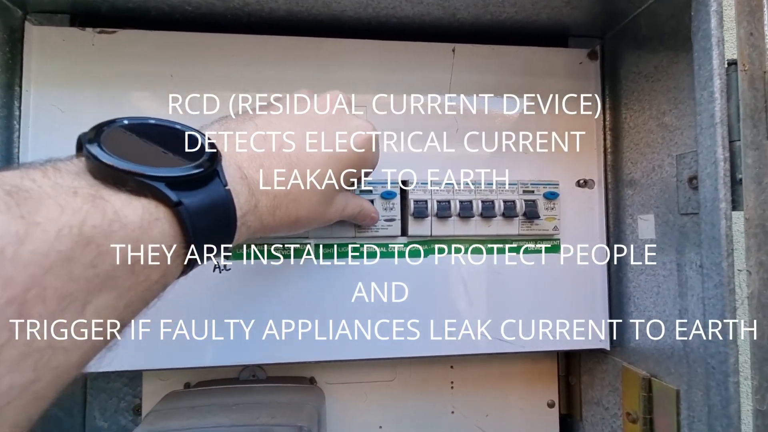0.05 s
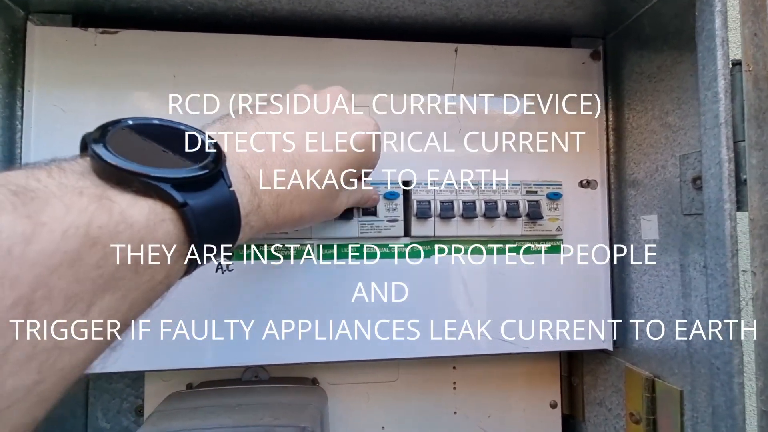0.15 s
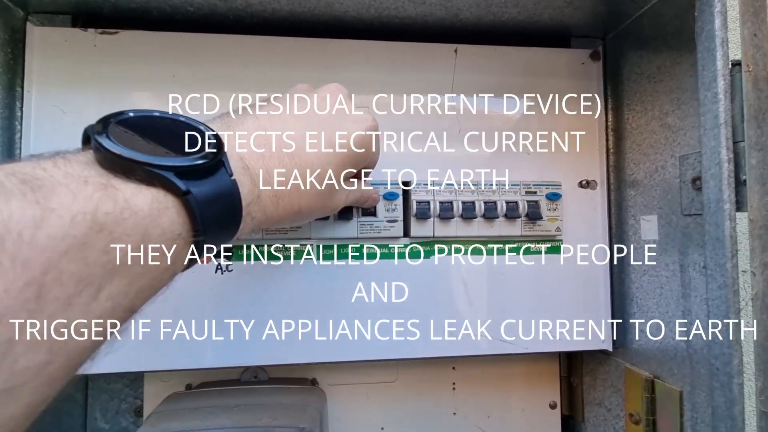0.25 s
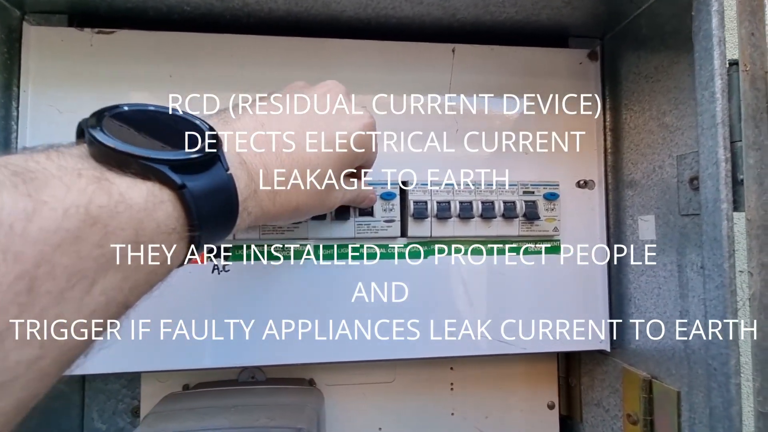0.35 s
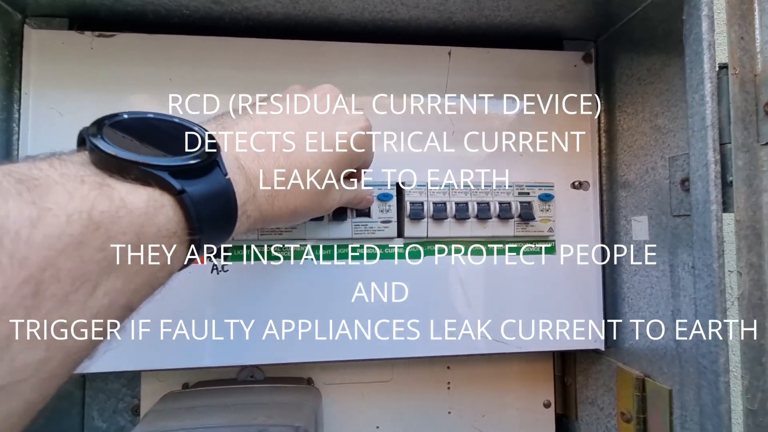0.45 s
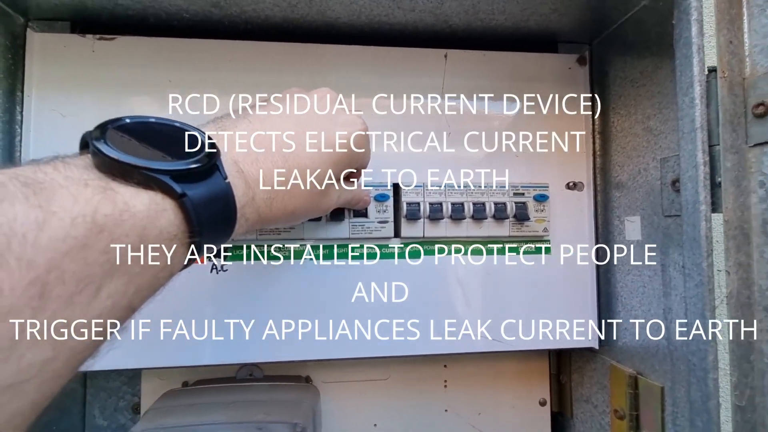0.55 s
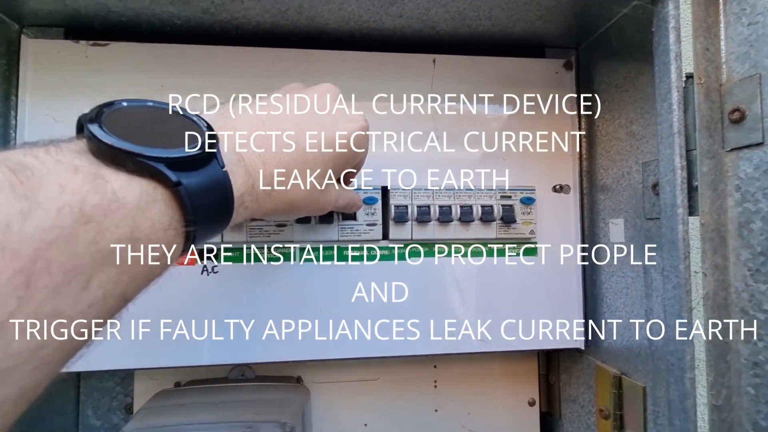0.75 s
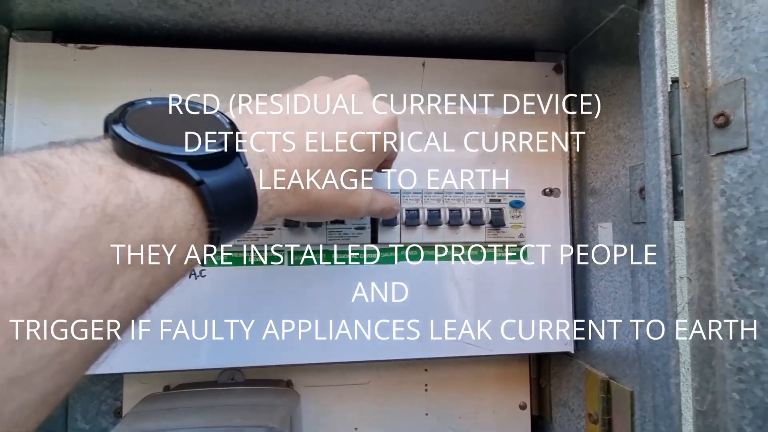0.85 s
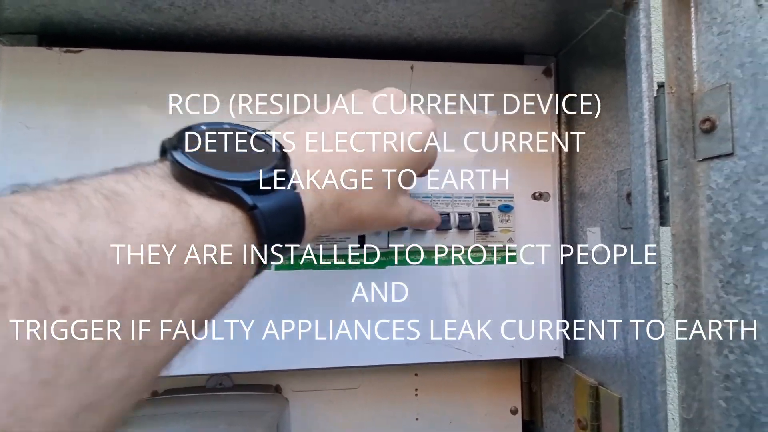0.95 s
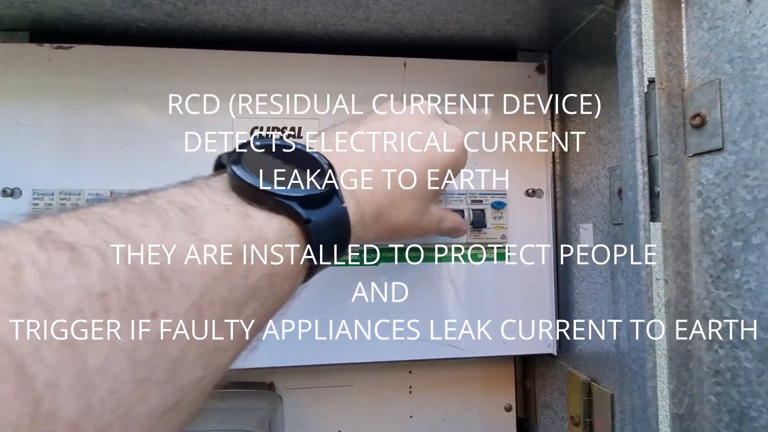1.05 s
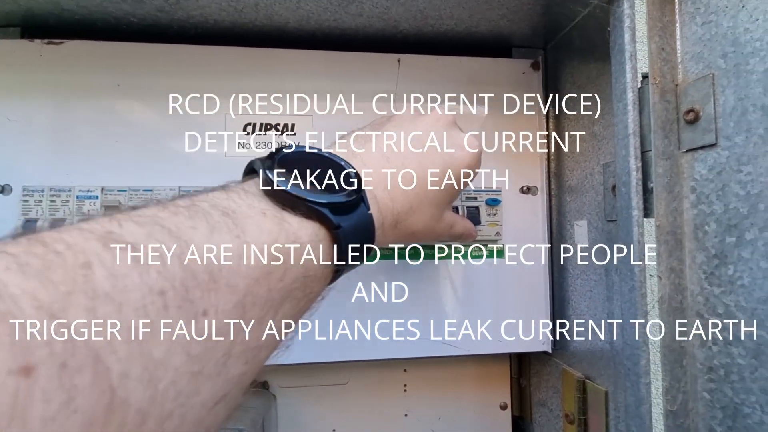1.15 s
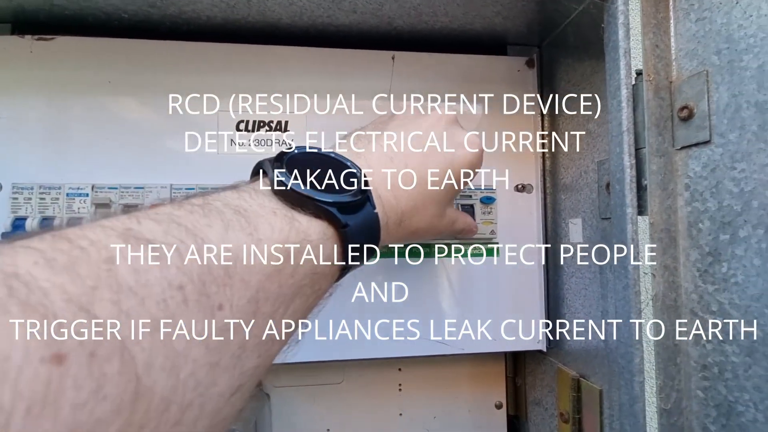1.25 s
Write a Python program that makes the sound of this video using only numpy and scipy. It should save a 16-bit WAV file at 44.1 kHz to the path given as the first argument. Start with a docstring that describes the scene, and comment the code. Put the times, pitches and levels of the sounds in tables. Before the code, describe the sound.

A switch on an outdoor electrical panel is flicked on with one sharp click.

```python
"""Safety switch on an outdoor switchboard.

A thumb pushes up the lever, close by. The latch ticks, the sprung contacts snap shut and rattle,
and the lever's thud rings the panel in its steel cabinet. The hand bumps the panel lightly.
A far bird calls over a quiet outdoor rumble."""
import sys
import numpy as np
from scipy import signal
from scipy.fft import rfft, irfft, next_fast_len
from scipy.io import wavfile

SR = 44100
rng = np.random.default_rng(int(sys.argv[2]) if len(sys.argv) > 2 else 0)


def master(y):
    """Save y as 16-bit WAV."""
    cut = np.clip(np.atleast_2d(y).T, -1, 1)
    pcm = np.round(cut * 32767)  # scale
    wavfile.write(sys.argv[1], SR, pcm.astype(np.int16))


N = 57330

# contact snaps and rattle (time [s], level [dB], t60 [s], echo [dB], metal ring [dB], top treble [dB])
CONTACT_SNAPS = [(0.2398, -20.5, 0.035, -15.5, -2.5, -1), (0.2693, -35, 0.04, -3.5, -14, 1),
                 (0.3138, -44, 0.037, -19.5, -9, -23.5), (0.349, -66, .05, 1, -14, -3.5)]
# snap spectrum (frequency [Hz], relative density [dB])
SNAP_SPECTRUM = [(300, -19.5), (1600, -19), (2150, -12.5), (3000, -10.5), (3800, -9), (4350, -12),
                 (5000, -3.5), (5850, -0.5), (6900, -3.5), (8200, -3), (10300, -8.5), (11200, -11.5),
                 (13000, -7.5), (15700, -15)]
# sliding lever's resonances (frequency [Hz], relative density [dB])
SCRAPE_SPECTRUM = [(1500, -50), (4200, -20.5), (6100, -6), (8600, -27.5), (11300, -4), (14000, -36)]
# switch's metal parts (frequency [Hz], relative level [dB], t60 [s])
METAL_MODES = [(2088, -26.5, 0.34), (2594, -21, .16), (5590, -15.5, 0.037), (5980, -6, 0.071),
               (6250, -4.5, 0.023), (7380, -15, .08), (8190, -11.5, .05)]
# blows on the panel (time [s], level [dB], tilt [dB/octave], share of full t60 [ratio])
PANEL_BLOWS = [(0.002, -48.5, -3, 0.27), (0.024, -57.5, 1.5, 0.47), (0.143, -52, -2.5, 0.61),
               (0.2452, -31.5, 5.5, 0.32), (0.2697, -26, 1.5, .9), (0.327, -49, -6, 0.62),
               (0.413, -52.5, 2.5, .7), (0.439, -54, -0.5, 0.87), (0.844, -69.5, 13.5, .5),
               (1.278, -58.5, -2.5, 0.83)]
# panel modes (frequency [Hz], relative level [dB], full t60 [s])
PANEL_RESONANCES = [(174.6, -12.5, .18), (273, -2.5, 0.33), (292.5, -6, 0.14), (344.5, -5.5, .36),
                    (372.6, -7, 0.37), (423.6, -7, 0.5), (466.6, -3, 0.33), (568, -8, 0.25),
                    (651, -11, 0.3), (832, -5.5, 0.2), (897, -9, .25), (1011, -16, .3), (1099, -14.5, 0.19),
                    (1187, -20, 0.28), (1319, -20, 0.24), (1591, -19.5, 0.25)]
# panel's dense clatter (frequency [Hz], relative density [dB])
CLATTER_SPECTRUM = [(40, -33.5), (100, -15.5), (200, 1.5), (450, 0.5), (700, -9), (900, 0), (1200, -11),
                    (1550, -11.5), (1750, -19), (2500, -19), (4200, -34.5), (9000, -44)]
# cabinet decay (frequency [Hz], full t60 [s])
CABINET_T60 = [(100, 0.13), (450, 0.5), (1000, 0.3), (2500, 0.28), (6000, 0.11), (14000, 0.13)]
# latch ticks (time [s], level [dB])
LATCH_TICKS = [(0.021, -67.5), (0.118, -55), (0.1219, -45), (0.143, -63)]
# tick spectrum (frequency [Hz], relative density [dB])
TICK_SPECTRUM = [(150, -18.5), (500, 1), (1050, -5.5), (1700, -23), (2400, -9.5), (3000, -21), (5500, -8.5),
                 (7100, -5.5), (7950, -3.5), (8800, -13.5), (11400, -17.5), (15500, -23)]
# latch ping (frequency [Hz], relative level [dB], t60 [s])
LATCH_PING = [(7950, -1, 0.025)]
# far bird's notes (time [s], length [s], pitch [Hz], level [dB])
BIRD_NOTES = [(0.524, 0.085, 3590, -78.5), (0.635, .09, 2264, -82.5), (0.672, 0.037, 3600, -82),
              (0.825, .05, 3567, -82), (0.873, 0.041, 3500, -80)]
# outdoor hiss (frequency [Hz], relative density [dB])
HISS_SPECTRUM = [(90, -35), (160, -5), (300, -1), (430, 2), (510, -12), (590, 1.5), (720, -7), (1050, -8),
                 (1900, -24), (3300, -25.5), (4200, -22), (9000, -20), (15700, -27)]
# outdoor rumble (frequency [Hz], relative density [dB])
RUMBLE_SPECTRUM = [(20, -29), (45, -5.5), (65, -0.5), (115, -2.5), (170, -16), (300, -48.5)]
# rumble swells (time [s], level [dB])
RUMBLE_ENVELOPE = [(0, -64.5), (.06, -70.5), (.13, -64.5), (.24, -63.5), (.36, -63), (.48, -62), (.54, -69),
                   (.62, -69), (.68, -63.5), (0.799, -69.5), (0.969, -70), (1.07, -62.5), (1.2, -70),
                   (1.3, -69)]


def contacts(shelf_from_hz=6800, shelf_full_hz=11000):
    """Sprung contacts crack shut, ring the switch's metal and echo in the cabinet."""
    out, t = np.zeros(N), clock()
    for start_s, db, t60_s, echo_db, metal_db, top_db in CONTACT_SNAPS:
        crack = noise(SNAP_SPECTRUM) * fade(t, t60_s)
        metal = amp(metal_db) * ring(METAL_MODES)
        echo = amp(echo_db) * cabinet(noise(SNAP_SPECTRUM)) * rise(attack_s=0.006)
        shelf = [(shelf_from_hz, 0), (shelf_full_hz, top_db)]
        snap = filtered(crack + metal + echo, lambda hz: amp(log_interp(shelf, hz)))
        add(out, start_s, amp(db) * snap * rise(attack_s=0.00043))
    return out


def lever_scrape(swell_s=0.011, swell_db=22, peak_db=-32):
    """The lever scrapes over its dead point, peaking at the first snap."""
    out, t = np.zeros(N), clock()
    swell = amp(peak_db + swell_db * np.minimum(t / swell_s - 1, 0))
    decay = fade(np.maximum(t - swell_s, 0), t60_s=0.0078)
    add(out, CONTACT_SNAPS[0][0] - swell_s, swell * decay * noise(SCRAPE_SPECTRUM))
    return out


def lever_thud(start_s=0.2697, hz=298, db=-20.5, t60_s=0.057):
    """The lever hits its stop: one short low mode."""
    out = np.zeros(N)
    add(out, start_s, ring([(hz, db, t60_s)]) * rise(attack_s=0.0019))
    return out


def panel(modes_db=-3, clatter_db=-7.5):
    """Each blow excites the panel's low modes and a dense clatter."""
    out = np.zeros(N)
    for start_s, db, db_per_octave, t60_share in PANEL_BLOWS:
        excitation = filtered(noise(CLATTER_SPECTRUM), lambda hz: tilt(hz, db_per_octave))
        clatter = amp(clatter_db) * cabinet(excitation, t60_share)
        modes = amp(modes_db) * ring(PANEL_RESONANCES, db_per_octave, t60_share)
        add(out, start_s, amp(db) * (modes + clatter) * rise(attack_s=0.0019))
    return out


def latch(tail_db=-12):
    """Small bright ticks as the lever takes up the spring."""
    out = np.zeros(N)
    for start_s, db in LATCH_TICKS:
        ping = ring(LATCH_PING)
        click = noise(TICK_SPECTRUM) * fade(clock(), t60_s=0.027)
        tail = amp(tail_db) * cabinet(noise(TICK_SPECTRUM))
        add(out, start_s, amp(db) * (ping + click + tail) * rise(attack_s=0.00096))
    return out


def cabinet(x, t60_share=1):
    """Each band of x decays at the steel cabinet's rate."""
    hz, t, bands = signal.stft(x, SR, nperseg=256)
    t60_s = t60_share * log_interp(CABINET_T60, hz)[:, None]
    return signal.istft(bands * fade(t, t60_s), SR, nperseg=256)[1][:N]


def bird(waver_rms_hz=65):
    """Faint wavering whistles."""
    out, t = np.zeros(N), clock()
    for start_s, length_s, hz, db in BIRD_NOTES:
        pitch_hz = hz + waver_rms_hz * noise([(100, 0), (400, -30), (2000, -80)])
        swell = np.sin(np.pi * np.minimum(t / length_s, 1))
        add(out, start_s, amp(db) * swell * np.sin(2 * np.pi * np.cumsum(pitch_hz) / SR))
    return out


def outdoors(hiss_db=-70):
    """Steady hiss over a swelling rumble."""
    rumble_db = np.interp(clock(), *np.transpose(RUMBLE_ENVELOPE))
    return amp(hiss_db) * noise(HISS_SPECTRUM) + amp(rumble_db) * noise(RUMBLE_SPECTRUM)


def ring(modes, db_per_octave=0, t60_share=1):
    """Damped sines; mode levels scatter by 1 dB per blow."""
    out, t = np.zeros(N), clock()
    for hz, db, t60_s in modes:
        gain = amp(db + rng.normal(0, 1)) * tilt(hz, db_per_octave)
        out += gain * fade(t, t60_share * t60_s) * np.sin(2 * np.pi * hz * t)
    return out


def noise(spectrum):
    """Random-phase noise of the given spectrum, rms 1."""
    hz = np.fft.rfftfreq(N, 1 / SR)
    phasors = np.exp(2j * np.pi * rng.random(len(hz)))
    x = irfft(amp(log_interp(spectrum, hz)) * phasors, N)
    return x / np.sqrt(np.mean(x ** 2) + 1e-20)


def filtered(x, response):
    """Zero-phase filter with gain response(hz)."""
    size = next_fast_len(N + SR // 2)
    hz = np.fft.rfftfreq(size, 1 / SR)
    return irfft(rfft(x, size) * response(hz), size)[..., :N]


def tilt(hz, db_per_octave):
    """Gain slope about 500 Hz, flat outside 200-1100 Hz."""
    return amp(db_per_octave * np.log2(np.clip(hz, 200, 1100) / 500))


def fade(t, t60_s):
    """Exponential decay."""
    return np.exp(-np.log(1000) * t / t60_s)


def rise(attack_s):
    """Soft onset."""
    return 1 - np.exp(-clock() / attack_s)


def log_interp(points, hz):
    """Read (frequency [Hz], value) points on a log axis."""
    knots_hz, values = np.transpose(points)
    return np.interp(np.log(hz + 1), np.log(knots_hz + 1), values)


def amp(db):
    """Decibels to gain."""
    return 10 ** (np.asarray(db) / 20)


def clock():
    """Sample times [s]."""
    return np.arange(N) / SR


def add(out, start_s, x):
    """Mix x into out from start_s."""
    i = round(start_s * SR)
    out[i:i + len(x)] += x[:N - i]


def scene():
    """All sources, centred."""
    mono = latch() + lever_scrape() + contacts() + panel() + lever_thud() + bird() + outdoors()
    return np.array([mono, mono])


def record(dry):
    """Steep low-pass."""
    top_hz, edge_hz = 16000, 300
    return filtered(dry, lambda hz: np.sin(np.pi / 2 * np.clip((top_hz - hz) / edge_hz, 0, 1)) ** 2)


dry = scene()
out = record(dry)
master(out)
```